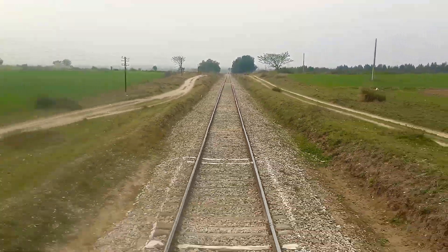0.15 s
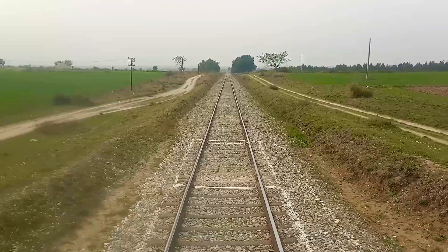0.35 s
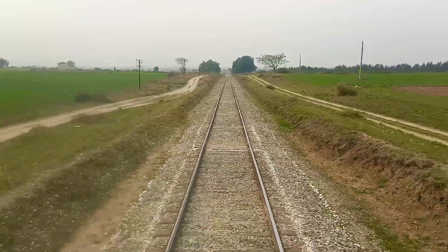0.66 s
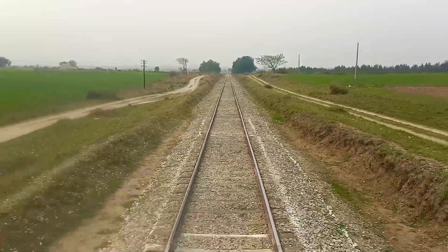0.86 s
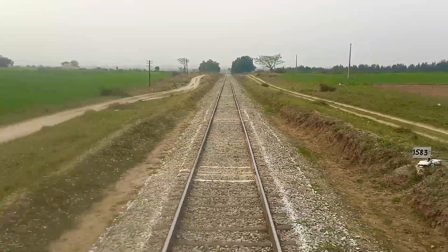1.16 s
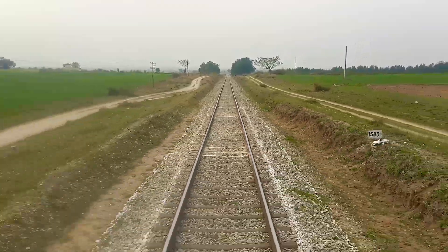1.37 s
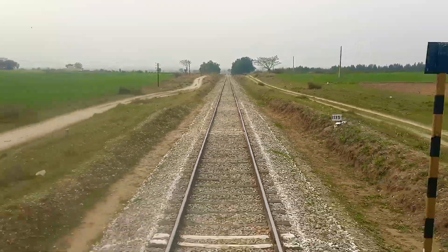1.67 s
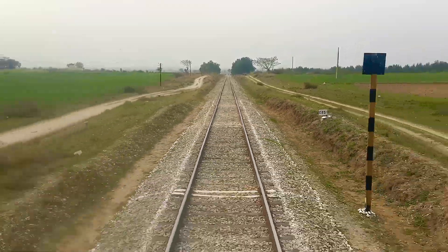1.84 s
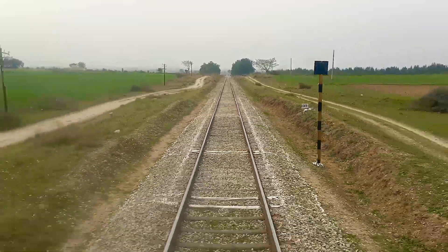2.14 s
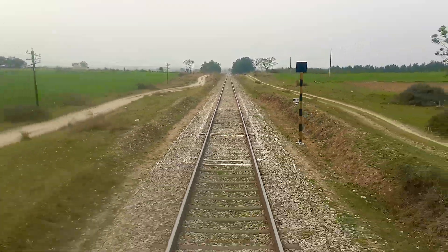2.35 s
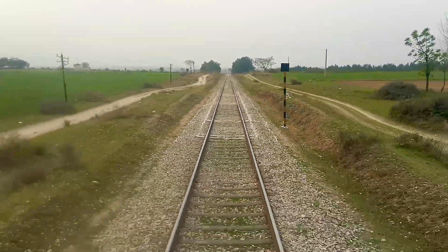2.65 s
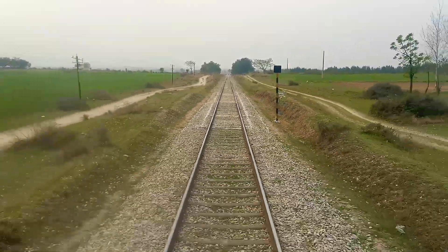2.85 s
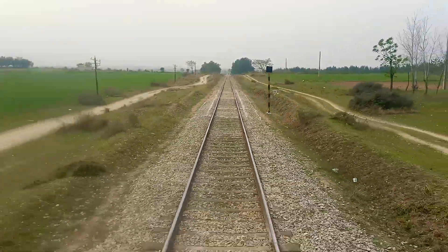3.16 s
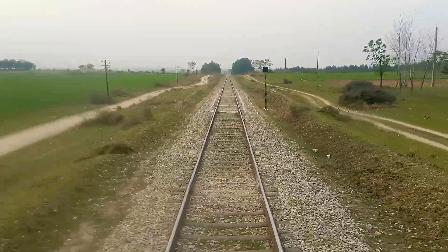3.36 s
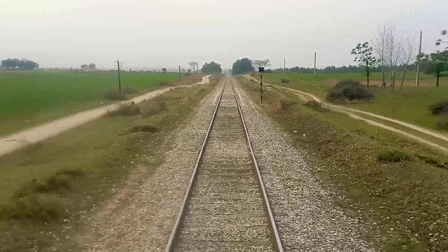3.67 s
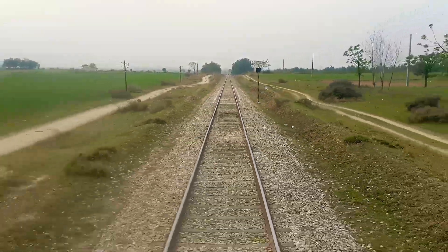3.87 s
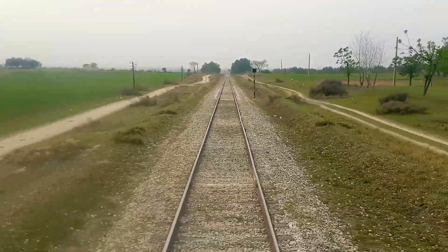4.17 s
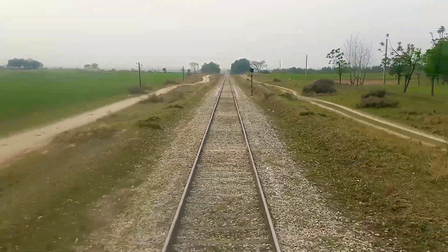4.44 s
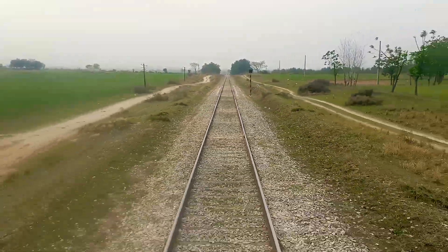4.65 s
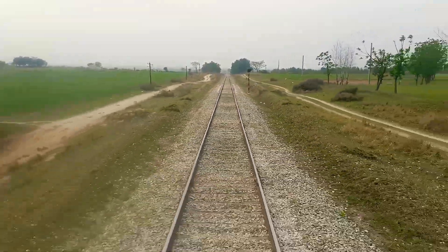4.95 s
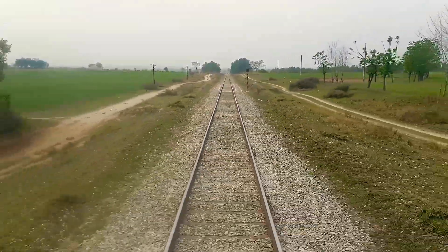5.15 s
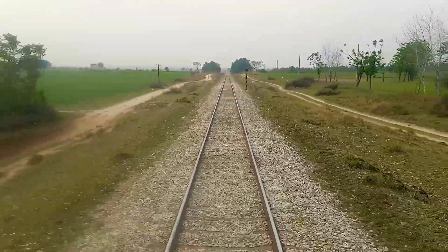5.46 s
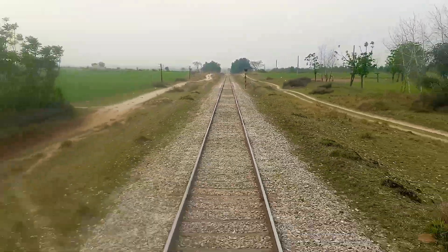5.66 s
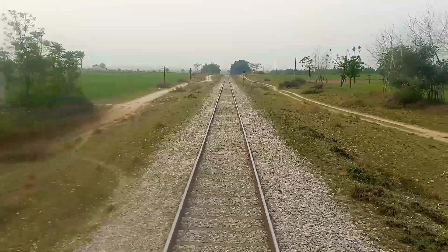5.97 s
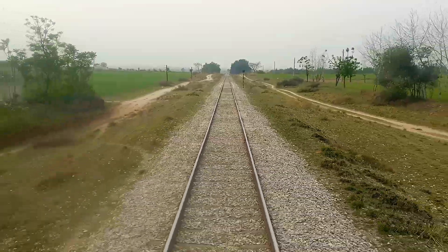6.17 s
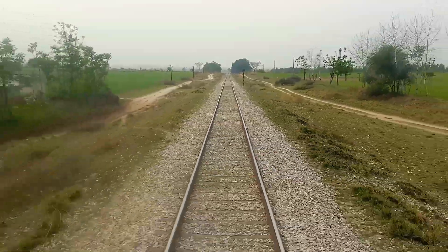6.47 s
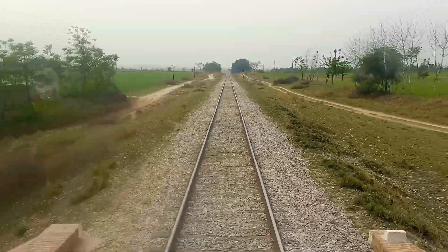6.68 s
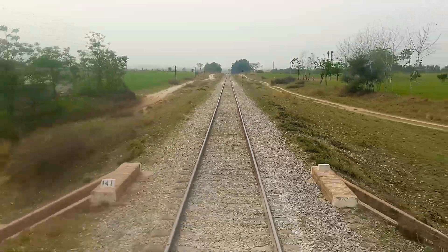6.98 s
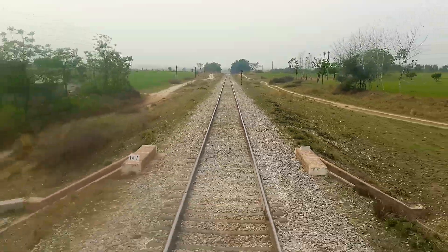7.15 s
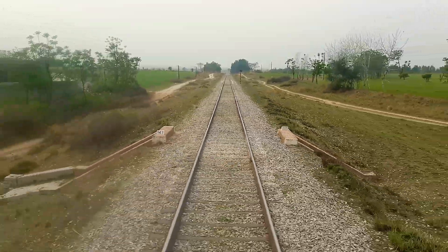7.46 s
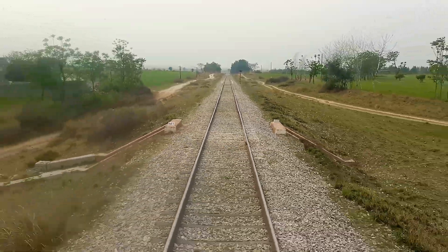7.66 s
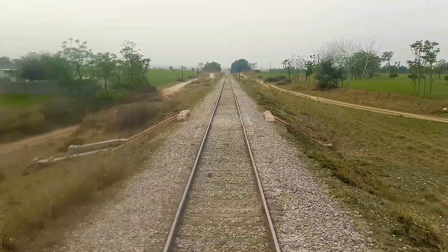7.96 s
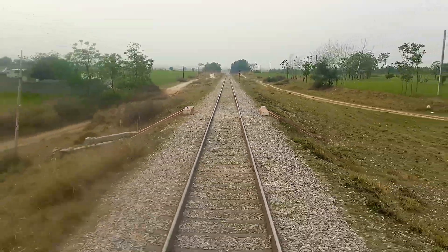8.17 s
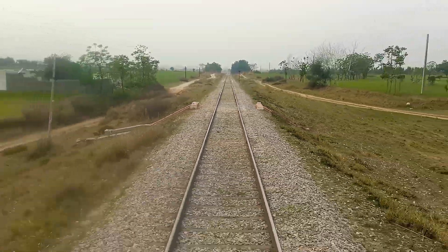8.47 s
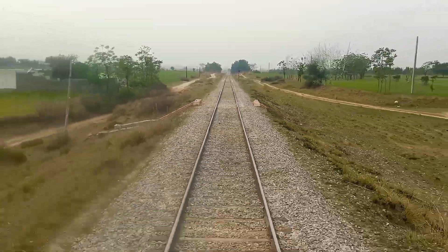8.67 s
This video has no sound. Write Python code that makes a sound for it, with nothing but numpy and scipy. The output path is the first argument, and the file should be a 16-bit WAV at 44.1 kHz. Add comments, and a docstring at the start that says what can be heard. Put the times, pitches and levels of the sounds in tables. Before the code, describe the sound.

Heard from the open rear end of a moving railway coach in flat countryside: a dense wheel roar and low rumble throughout. Every 0.8 seconds two axles strike a rail joint, ta-dum, the second blow stronger, with a hard clack and floor boom. Loose steel chatters and rattles after the blows, while a mid-pitched wheel howl wavers. Close stereo microphone, bass centred, bright metal mostly to the right.

```python
"""Rough steel wheels roar, howl and ring on jointed track, heard at the open rear end of a railway coach.
The two axles of a bogie strike each joint, ta-dum, about every .8 s; second strikes and lone knocks add to it.
The blows clack, boom in the floor modes and shake loose steel fittings, which chatter, rattle and tap.
Rolling, chatter and hiss are shaped noise, howl and drone are noise-driven modes, clinks are decaying sines.
All is made as mid and side, then spread over two microphone ports."""
import sys
import numpy as np
from scipy import signal
from scipy.fft import rfft, irfft, next_fast_len
from scipy.io import wavfile
from scipy.ndimage import uniform_filter1d

SR = 44100
rng = np.random.default_rng(int(sys.argv[2]) if len(sys.argv) > 2 else 0)


def file_out(sig):
    """Save sig as 16-bit WAV at sys.argv[1]."""
    # one column per channel
    cols = np.atleast_2d(sig).T
    # limit, then scale
    lim = np.clip(cols, -1, 1)
    pcm = np.round(lim * 32767).astype(np.int16)
    wavfile.write(sys.argv[1], SR, pcm)


N = 388962
SIZE = next_fast_len(N + SR // 2, real=True)  # room for tails past the end
FREQS = np.arange(SIZE // 2 + 1) * SR / SIZE
TIME = np.arange(SIZE) / SR
MID_ONLY = np.array([[1], [0]])  # alike at both ports
BLOW_RISE_S, AFTER_RISE_S = 0.021, 0.027  # to the peak of a blow, to the widest swing after it

# spectrum of chattering steel: hz, relative_db
CHATTER_SPECTRUM = [(600, -34), (1500, 11), (2700, 9), (3500, -1.5), (4500, 1), (5450, 6.5), (6100, 0.5),
                    (6700, -8.5), (7500, -11), (8300, -26.5), (9700, -27), (13500, -26.5), (15000, -33.5)]


def undb(db):
    """Decibels to gain."""
    return 10 ** (np.asarray(db) / 20)


def over_hz(points):
    """Join (hz, value) points on a log-frequency axis."""
    hz, value = np.transpose(points)
    return np.interp(np.log(FREQS + 1e-3), np.log(hz), value)


def over_time(table):
    """Join each column of (s, ..) rows in time."""
    s, *columns = np.transpose(table)
    return [np.interp(TIME, s, column) for column in columns]


def walk(rate_hz):
    """Smooth chance with a spread near 1, changing about rate_hz times a second."""
    hold = max(int(SR / rate_hz), 2)
    steps = np.repeat(rng.standard_normal(SIZE // hold + 2), hold)
    steps = steps[rng.integers(hold):][:SIZE]
    return 1.3 * uniform_filter1d(uniform_filter1d(steps, hold), hold)


def contacts(rough_db, rate_hz):
    """Dense tiny impacts in clumps of rough_db spread, as mid and side noise; rms 1."""
    x = rng.standard_normal((2, SIZE)) * undb(rough_db * walk(rate_hz))
    return x / x.std()


def radiate(x, spectrum):
    """Causal minimum-phase filter of unit power: a source spectrum lifted at the body resonances."""
    # resonances of the coach end and bogie: hz, width_hz, lift_db
    body = [(88.8, 16, 5.5), (192, 22.5, 5), (279, 56, 4), (397, 37, 3.5), (449, 82, 2), (685, 169, 9),
            (1457, 53, 5), (1723, 40, 4), (1799, 45, 6.5), (2287, 90, 5), (2396, 100, 3), (2651, 83, 6),
            (2865, 120, 3.5), (3184, 97, 7), (3967, 650, 7), (5290, 35, 5), (8540, 250, 5), (9050, 90, 4.5),
            (10300, 300, 2.5), (11200, 500, 2.5)]
    db = over_hz(spectrum)
    for hz, width_hz, lift_db in body:
        db = db + lift_db / (1 + (2 * (FREQS - hz) / width_hz) ** 2)
    gain = undb(db) / np.sqrt(np.mean(undb(db) ** 2))
    cepstrum = irfft(np.log(gain), SIZE)[:SIZE // 2]
    cepstrum[1:] *= 2  # folding the cepstrum gives minimum phase
    return irfft(rfft(x) * np.exp(rfft(cepstrum, SIZE)), SIZE)


def mode(hz, width_hz, steadiness=0):
    """Resonance driven by random contacts, drifting with hz; steadiness 0-1 evens its swing; rms 1."""
    drive = rng.standard_normal((2, SIZE)) + 1j * rng.standard_normal((2, SIZE))
    pole = np.exp(-np.pi * width_hz / SR)
    swing = signal.lfilter([1], np.poly([pole, pole]), drive)
    if steadiness:
        swing = swing / np.hypot(abs(swing), swing.std() / 2) ** steadiness
    cycles = np.cumsum(np.broadcast_to(hz, SIZE)) / SR
    x = (swing * np.exp(2j * np.pi * cycles)).real
    return x / x.std()


def ring_down(t, t60_s, attack_s):
    """Envelope of a struck piece: quick onset, exponential decay."""
    return np.exp(-np.log(1000) * t / t60_s) * (1 - np.exp(-t / attack_s))


def swell(t, rise_s, sharpness):
    """Builds up to 1 at the rise time as the parts rebound, then dies away."""
    u = t / max(rise_s, 1e-3)
    return (u * np.exp(1 - u)) ** abs(sharpness)


def bursts(times_s, levels_db, rises_s, sharpness, tail_db=-20, tail_s=0.17):
    """Envelope of a series of blows, each with a faint tail; overlaps add in power."""
    power, t = np.zeros(SIZE), np.arange(SR // 2) / SR
    for s, db, rise_s in zip(times_s, levels_db, np.broadcast_to(rises_s, len(times_s))):
        tail = undb(tail_db) * np.minimum(t / rise_s, 1) * np.exp(-t / tail_s)
        shape = swell(t, rise_s, sharpness) + tail
        start = int(s * SR)
        power[start:start + len(t)] += (undb(db) * shape) ** 2
    return np.sqrt(power)


def swells(table):
    """Envelope of smooth rises and falls from (peak_s, level_db, half_length_s) rows."""
    power = sum((undb(db) * np.exp(-((TIME - s) / half_s) ** 2)) ** 2 for s, db, half_s in table)
    return np.sqrt(power)


def driven(usual_db, db_per_db):
    """Gain of a part that the rolling keeps going: louder on rougher rail."""
    # roughness of the rail head along the way: s, rolling_db
    rail = [(0.0, -31), (0.24, -32), (0.37, -27), (0.81, -32), (1.75, -28.5), (2.06, -27), (2.36, -31.5),
            (2.75, -28), (2.97, -33.5), (3.1, -28.5), (3.23, -33), (3.4, -28.5), (3.76, -27), (4.27, -29),
            (4.55, -30), (6.19, -28), (6.58, -24), (6.73, -34.5), (6.88, -34), (8.28, -28), (8.5, -30),
            (8.82, -29.5)]
    rail_db, = over_time(rail)
    return undb(usual_db + db_per_db * (rail_db - rail_db.mean()))


def blows():
    """Rows of (s, clack_db, boom_db, clash_db, boom_hz): two axles a joint, and single extra blows."""
    # bogie crossing a joint: rear_axle_s, clack_db, boom_db, clash_db, front_re_rear_db,
    # front_boom_hz, rear_boom_hz
    crossings = [(0.491, -13, -14.5, -40.5, -4.5, 139, 196), (1.261, -16, -25.5, -35, -12.5, 200, 227),
                 (2.036, -12, -23.5, -34, -7, 242, 223), (2.816, -11, -25.5, -40.5, -5.5, 213, 192),
                 (3.586, -16.5, -22.5, -35.5, -4, 142, 263), (4.367, -14.5, -23.5, -36.5, -1, 140, 260),
                 (5.140, -16, -25.5, -34.5, -5.5, 254, 99), (5.921, -16.5, -26.5, -38.5, -1, 165, 279),
                 (6.642, -13, -14, -34.5, -4, 209, 256), (7.478, -16, -22.5, -37, -9, 229, 276),
                 (8.262, -12.5, -18.5, -36, -7.5, 220, 268)]
    # second strikes at joints and lone knocks between: s, clack_db, boom_db, clash_db, boom_hz
    extra = [(0.207, -20.5, -30.5, -57, 225), (0.429, -21, -21, -49, 254), (0.53, -23.5, -32, -37.5, 192),
             (1.89, -24.5, -28, -55, 240), (2.68, -24.5, -26, -57, 160), (3.813, -22.5, -26, -48, 92),
             (4.962, -22, -25.5, -53, 252), (5.795, -20, -29.5, -52, 165), (6.700, -14, -28, -47, 263),
             (7.535, -29, -25, -50, 280), (8.202, -23.5, -28, -41, 268), (8.72, -29, -23.5, -51, 258)]
    axle_gap_s, front_boom_db, front_clash_db = .169, 1.5, -8
    rear, front = [], []
    for s, clack_db, boom_db, clash_db, front_db, front_hz, rear_hz in crossings:
        rear.append((s, clack_db, boom_db, clash_db, rear_hz))
        # the front axle strikes first; it is further away, so it is weaker and duller
        front.append((s - axle_gap_s, clack_db + front_db, boom_db + front_db + front_boom_db,
                      clash_db + front_db + front_clash_db, front_hz))
    return np.array(rear + front + extra)


def afterswing():
    """How hard the floor and the fittings still swing after the blows: two envelopes."""
    s, _, boom_db, clash_db, _ = blows().T
    return [bursts(s, db, AFTER_RISE_S, sharpness=0.66) for db in (boom_db, clash_db)]


def roar():
    """Roughness of rail and tread excites wheel and rail in a dense roar."""
    # rolling roar: hz, relative_db
    spectrum = [(80, -34.5), (170, -9), (260, -0.5), (480, -0.5), (600, -2), (900, -2), (1300, -4),
                (1700, -15), (2500, -19.5), (3000, -18), (3500, -35), (5500, -27), (8000, -58.5),
                (15000, -79.5)]
    roughness = contacts(rough_db=.8, rate_hz=110) * undb(.6 * walk(14))
    return radiate(roughness * driven(usual_db=-28, db_per_db=0.78), spectrum)


def rumble():
    """Rolling shakes the underframe, which rumbles in slow clumps."""
    # underframe: hz, relative_db
    spectrum = [(20, -52), (32, -15), (45, -11), (80, -6.5), (160, -3), (230, -14), (400, -23.5),
                (1000, -71)]
    # course of the rumble: s, relative_db
    course = [(0.0, -46), (0.54, -37), (0.86, -43), (1.6, -45), (2.75, -41.5), (3.25, -47), (3.56, -38),
              (4.59, -45.5), (6.48, -45), (7.1, -51), (8.25, -42), (8.82, -47.5)]
    level_db, = over_time(course)
    return radiate(contacts(rough_db=3.0, rate_hz=35) * undb(level_db + 3.5), spectrum)


def wheel_pitch():
    """Pitches of howl and ring in Hz: the contact shifts across the tread and they wander."""
    # wheel tones: s, howl_hz, ring_hz
    pitches = [(0, 700, 1442), (2.2, 680, 1440), (3.3, 684, 1438), (4.2, 706, 1464), (5.0, 706, 1462),
               (6.3, 720, 1470), (7.3, 704, 1462), (8.82, 714, 1472)]
    return over_time(pitches)


def howl():
    """Three close wheel modes beat, kept going by the rolling and struck again by each blow."""
    # close modes: offset_from_howl_hz, width_hz, relative_db
    close_modes = [(-45, 50, -7.5), (0, 36, -2.5), (42, 36, -9.5)]
    # course of the howl: s, level_db
    course = [(0, -41), (.6, -38), (2.0, -41), (2.45, -29.5), (2.55, -37.5), (2.7, -28), (3.0, -37),
              (3.4, -37.5), (3.95, -31), (4.25, -30), (4.8, -35), (4.92, -25), (5.1, -28), (5.26, -35),
              (5.4, -32), (5.75, -28), (6.1, -32.5), (6.55, -27), (6.85, -40.5), (7.4, -31.5), (7.8, -29.5),
              (7.93, -41), (8.04, -24), (8.12, -39), (8.28, -25), (8.4, -30.5), (8.82, -33)]
    level_db, = over_time(course)
    howl_hz, _ = wheel_pitch()
    tone = 0
    for offset_hz, width_hz, db in close_modes:
        pitch_hz = howl_hz + offset_hz + 9 * walk(6)
        tone = tone + mode(pitch_hz, width_hz, steadiness=.25) * undb(db + walk(24))
    s, clack_db, *_ = blows().T
    struck = bursts(s, clack_db - 13, AFTER_RISE_S, sharpness=1)
    return tone * np.hypot(undb(level_db), struck)


def wheel_ring():
    """A higher wheel mode rings with slightly evened swing as the contact wanders."""
    # course of the high ring: s, relative_db
    course = [(0, -46.5), (1.35, -42.5), (1.65, -33.5), (1.95, -49), (2.45, -43), (2.8, -36.5), (3.0, -48),
              (3.5, -42.5), (3.9, -47), (4.38, -34.5), (4.6, -41.5), (5.35, -41), (5.68, -34.5), (6.2, -38),
              (6.6, -36.5), (6.9, -45.5), (7.5, -41.5), (7.78, -37), (8.08, -33), (8.45, -45.5),
              (8.82, -36.5)]
    level_db, = over_time(course)
    _, ring_hz = wheel_pitch()
    tone = mode(ring_hz + 7 * walk(9), width_hz=46, steadiness=.2)
    return tone * undb(1.5 * walk(12) - .5) * undb(level_db - 2.5)


def drone(floor_swing):
    """Two floor panels drone as the coach shakes; the upper one also swings after each blow."""
    # course of the drones: s, upper_db, lower_db
    course = [(0, -37.5, -51.5), (.95, -53, -55.5), (1.1, -38.5, -34), (1.6, -33.5, -38),
              (2.1, -36.5, -39.5), (2.4, -42.5, -45.5), (3.3, -44.5, -49), (3.6, -37, -48),
              (4.4, -30.5, -45), (4.7, -35.5, -50), (5.85, -29.5, -39), (6.25, -37, -45.5),
              (6.6, -37.5, -40), (6.9, -39.5, -46), (7.35, -42, -45.5), (7.55, -37, -41), (7.8, -33, -41.5),
              (8.2, -30, -41), (8.82, -34, -43.5)]
    upper_db, lower_db = over_time(course)
    upper = mode(hz=287 + 6 * walk(6), width_hz=52) * undb(walk(9) - .7)
    lower = mode(hz=190, width_hz=24)
    upper_gain = np.hypot(undb(upper_db), undb(-13.5) * floor_swing)
    return upper * upper_gain + lower * undb(lower_db)


def chatter(shake):
    """Loose steel parts chatter in random clumps with the shaking."""
    return radiate(contacts(rough_db=0.0, rate_hz=260) * shake * undb(1.8 * walk(29) + 4.0),
                   CHATTER_SPECTRUM)


def grazing():
    """Thin steel edges graze each other: drifting, flickering resonances."""
    # edges: hz, width_hz, relative_db
    edges = [(2985, 950, -1.5), (5580, 140, -4.5)]
    return sum(mode(hz * (1 + .008 * walk(7)), width_hz) * undb(db + 2.5 * walk(40))
               for hz, width_hz, db in edges)


def tapping():
    """Loose pieces are tapped at random, each ringing briefly near its own pitch; rms 1."""
    # tapped pieces: hz, relative_db
    pieces = [(2270, -4), (2682, 0), (2800, -3), (3130, -6), (3970, -13), (5215, -7)]
    taps_per_s, t60_s = 13, .1  # taps of each piece
    out, t = np.zeros((2, SIZE)), np.arange(SR // 6) / SR
    for hz, db in pieces:
        for when, softness, detune, *phase in rng.random((int(taps_per_s * N / SR), 5)):
            turns = hz * (1 + .012 * (detune - .5)) * t + np.array(phase)[:, None]
            fade = ring_down(t, t60_s, attack_s=.001)
            start = int(when * N)
            out[:, start:start + len(t)] += undb(db - 10 * softness) * fade * np.sin(2 * np.pi * turns)
    return out / out.std()


def rattles():
    """Fittings break into short rattles that build up and fade."""
    # rattles: start_s, relative_db, rise_s
    events = [(0.0, -46, .09), (0.29, -34.5, 0.15), (0.43, -35, 0.073), (0.58, -38, 0.11),
              (0.945, -36, 0.055), (1.36, -36.5, 0.043), (2.63, -43, 0.027), (2.74, -33, 0.066),
              (2.995, -32, 0.04), (3.25, -41, .05), (3.39, -36.5, 0.069), (3.64, -35, .04),
              (3.72, -33.5, 0.031), (3.86, -31.5, .045), (4.93, -37.5, 0.088), (7.31, -44, 0.027),
              (7.51, -43, .04)]
    s, db, rise_s = np.transpose(events)
    envelope = bursts(s, db - 2.5, rise_s, sharpness=1.2)
    return radiate(contacts(rough_db=2, rate_hz=150) * envelope, CHATTER_SPECTRUM)


def fittings(fitting_swing):
    """Rolling and the swing after each blow shake loose steel, which chatters, grazes, taps and rattles."""
    shake = np.hypot(driven(usual_db=-50, db_per_db=0.82), undb(-11) * fitting_swing)
    touching = grazing() * undb(-6.5) + tapping() * undb(-2.5)
    return chatter(shake) + rattles() + shake * touching


def grit():
    """Small hard grains tick against the steel."""
    # ticks: start_s, level_db
    ticks = [(0.135,-57), (2.43,-64), (4.553,-63), (5.061,-51)]
    # tick: hz, relative_db
    spectrum = [(2000, -23), (6000, 12.5), (9000, -4), (14000, -3.5), (16000, -14)]
    s, db = np.transpose(ticks)
    envelope = bursts(s, db, 0.0032, sharpness=0.55)
    return radiate(contacts(rough_db=3.0, rate_hz=830) * envelope, spectrum)


def knocks():
    """Impulses of hard contact: uneven rebounds after each blow, and slack brake rigging knocking once."""
    # rebounds after a blow: delay_s, strength_re_clack_db
    rebounds = [(.001, 11), (.007, 13), (.013, 13.5), (.02, 15), (.025, 15), (.031, 13.5), (.038, 11),
                (.047, 11), (.058, 8)]
    # brake rigging: s, relative_db
    rigging = [(1.590, 0), (2.255, 0), (2.716, 3.5), (8.504, 5), (8.760, 3), (8.799, 3)]
    delay_spread, strength_spread_db = .15, 3  # share of the delay, dB
    out = np.zeros(SIZE)
    delay_s, strength_db = np.transpose(rebounds)
    for s, clack_db, *_ in blows():
        late, hard, way = rng.uniform(-1, 1, (3, len(delay_s)))
        sizes = undb(strength_db + strength_spread_db * hard)
        sizes *= np.linalg.norm(undb(strength_db)) / np.linalg.norm(sizes)  # they share the blow's energy
        when = ((s + delay_s * (1 + delay_spread * late)) * SR).astype(int)
        out[when] += undb(clack_db) * sizes * np.sign(way)
    for s, db in rigging:
        out[int(s * SR)] += undb(db)
    return out


def clack():
    """Hard knocks and the jolt of rough contacts after each blow clack in the bogie."""
    # clack: hz, relative_db
    spectrum = [(40,-51.5), (90,-15), (200,-3.5), (300,-1.5), (440,4), (680,-4), (1000,-3), (1300,-2),
                (1800,-19), (2600,-22.5), (3500,-31.5), (6000,-40), (12000,-68)]
    s, clack_db, *_ = blows().T
    jolt = bursts(s, clack_db - 7, BLOW_RISE_S, sharpness=1.4, tail_db=-22, tail_s=.07)
    # the knocks come from straight below
    return radiate(knocks() * MID_ONLY + contacts(rough_db=2, rate_hz=400) * jolt, spectrum)


def clash():
    """Each blow makes steel parts clash in a short shiver of contacts."""
    s, _, _, clash_db, _ = blows().T
    shiver = bursts(s, clash_db, BLOW_RISE_S, sharpness=1.1, tail_db=-14, tail_s=.08)
    return radiate(contacts(rough_db=3, rate_hz=340) * shiver, CHATTER_SPECTRUM)


def boom():
    """Each blow sets the floor modes near its boom pitch swinging; a longer, softer push excites lower ones."""
    # modes of floor and walls: hz, relative_db
    floor_modes = [(68,-6), (89,4), (121,2), (150,3.5), (190,4.5), (232,-4.5), (272,4), (303,3), (365,3),
                   (412,-9), (462,-2)]
    out, t = np.zeros(SIZE), np.arange(SR // 3) / SR
    hz, mode_db = np.transpose(floor_modes)
    heave = swell(t, BLOW_RISE_S / 2, sharpness=0.23)  # the floor answers before the rattles build up
    for s, _, db, _, boom_hz in blows():
        weights = undb(mode_db) * np.exp(-(np.log2(hz / boom_hz) / 0.54) ** 2)  # width in octaves
        weights *= np.sqrt(2 / np.sum(weights ** 2))
        detune, phase = rng.standard_normal((len(hz), 1)), rng.random((len(hz), 1))
        turns = hz[:, None] * (1 + 0.021 * detune) * t + phase
        swing = weights @ np.sin(2 * np.pi * turns)
        start = int(s * SR)
        out[start:start + len(t)] += undb(db - 4.5) * swing * heave
    # the boom carries little treble
    muffled = signal.sosfilt(signal.butter(4, 800, fs=SR, output="sos"), out)
    return muffled * MID_ONLY


def bright_hiss():
    """Noise-driven treble resonances swell in short flange brushes and long faint stretches of hiss."""
    # hiss resonances: hz, width_hz, relative_db
    resonances = [(2625, 760, -3), (5180, 200, -6), (5540, 880, -1), (11500, 5200, -23)]
    # brushes and long faint stretches of hiss: peak_s, relative_db, half_length_s (to 1/e)
    stretches = [(0.52, -40, 0.063), (0.62, -46, 0.062), (1.035, -45.5, 0.048), (2.84, -46, 0.019),
                 (3.04, -44.5, 0.052), (3.62, -51, 0.051), (7.95, -58, .2), (8.55, -58.5, 0.34)]
    hiss = sum(undb(db) * mode(hz, width_hz) for hz, width_hz, db in resonances)
    return hiss * swells(stretches) * undb(1.5 * walk(74))


def clinks():
    """Light metal pieces touch and ring briefly, never at quite the same pitch."""
    # touches: start_s, level_db
    touches = [(1.594,-48), (3.252,-40), (5.255,-45), (6.060,-38.5), (6.205,-45), (7.640,-41), (7.865,-45),
               (8.754,-47)]
    # ringing modes: hz, relative_db, t60_s
    partials = [(5215, -2.5, .14), (5270, -7, .1), (3970, -9, .13), (2690, -3, .15)]
    out, t = np.zeros((2, SIZE)), np.arange(SR // 3) / SR
    for s, db in touches:
        start = int(s * SR)
        for hz, mode_db, t60_s in partials:
            turns = hz * (1 + 0.0046 * rng.standard_normal()) * t + rng.random((2, 1))
            fade = ring_down(t, t60_s, attack_s=0.002)
            out[:, start:start + len(t)] += undb(db + mode_db) * fade * np.sin(2 * np.pi * turns)
    return out


def scene():
    """Sum all sources and spread them: alike in the bass, largely unrelated above, mostly brighter right."""
    # likeness of the two microphone ports: hz, correlation
    likeness = [(40, .96), (68, .92), (110, .98), (190, .97), (300, .92), (520, .72), (740, .78),
                (900, .15), (1200, -.4), (1460, .1), (1800, -.12), (4000, .02)]
    # level balance of the ports: hz, left_minus_right_db
    facing = [(900, 0), (1300, 1), (1650, 3), (2000, -1), (2400, -10.5), (3000, -8.5), (3600, -2),
              (4400, -6.5), (5500, -8), (6800, -1.5), (9000, -2.5), (13000, 4.5)]
    floor_swing, fitting_swing = afterswing()
    wheels = roar() + rumble() + howl() + wheel_ring() + bright_hiss()
    struck = clack() + clash() + boom() + drone(floor_swing)
    loose = fittings(fitting_swing) + grit() + clinks()
    mid, side = rfft(wheels + struck + loose)
    alike, lean_db = np.clip(over_hz(likeness), -.99, .99), over_hz(facing)
    mid, side = mid * np.sqrt((1 + alike) / 2), side * np.sqrt((1 - alike) / 2)
    left = (mid + side) * undb(lean_db / 2)
    right = (mid - side) * undb(-lean_db / 2)
    return irfft(np.array([left, right]), SIZE)[:, :N]


def record(dry):
    """The microphone loses the deepest bass; the recorder cuts the top."""
    bottom_hz, top_hz = 32, 14400
    thinned = signal.sosfilt(signal.butter(4, bottom_hz, "high", fs=SR, output="sos"), dry)
    return signal.sosfilt(signal.ellip(8, .2, 70, top_hz, fs=SR, output="sos"), thinned)


dry = scene()
out = record(dry)
file_out(out)
```